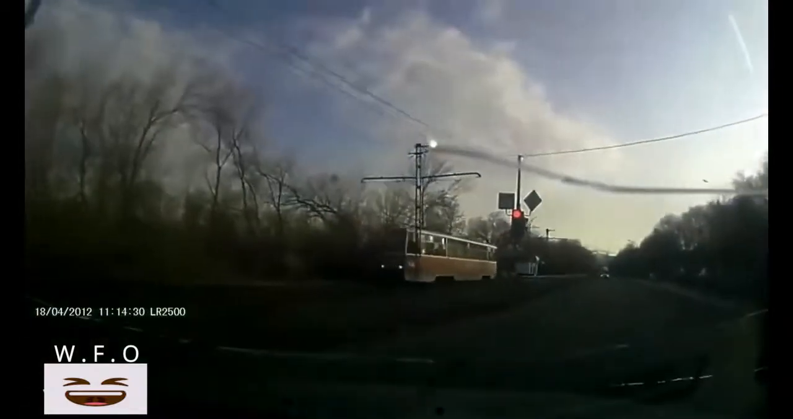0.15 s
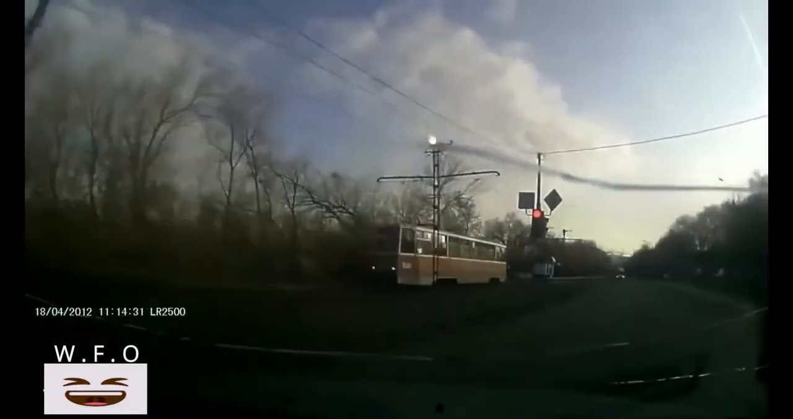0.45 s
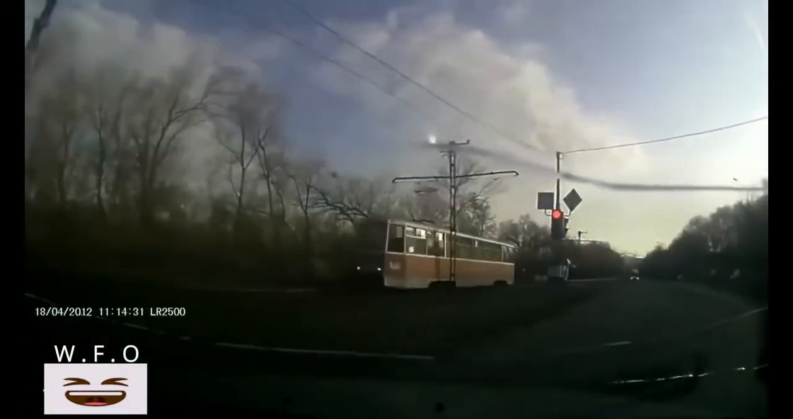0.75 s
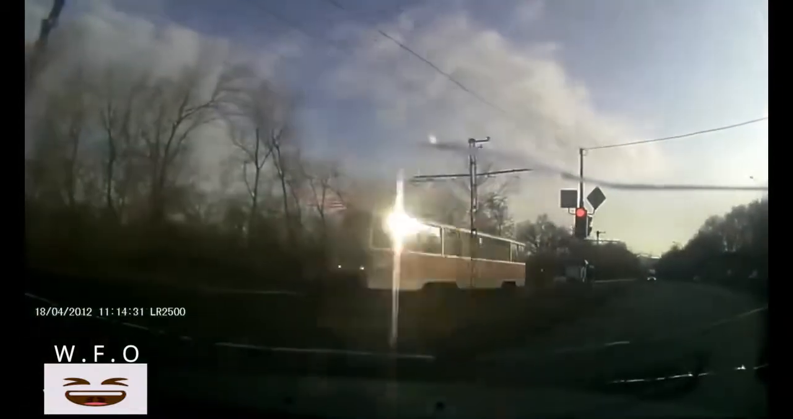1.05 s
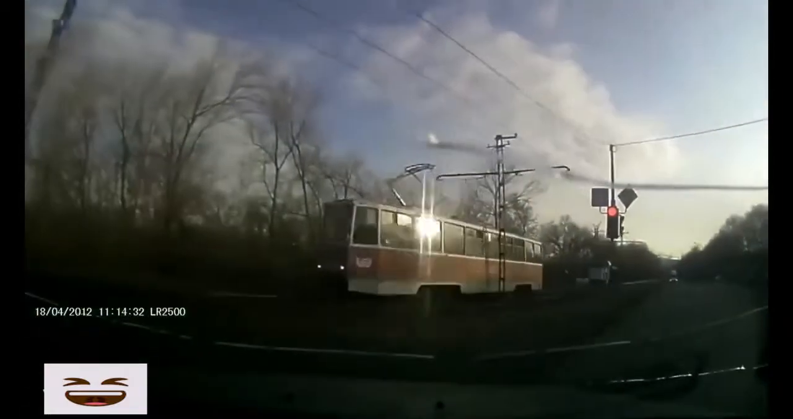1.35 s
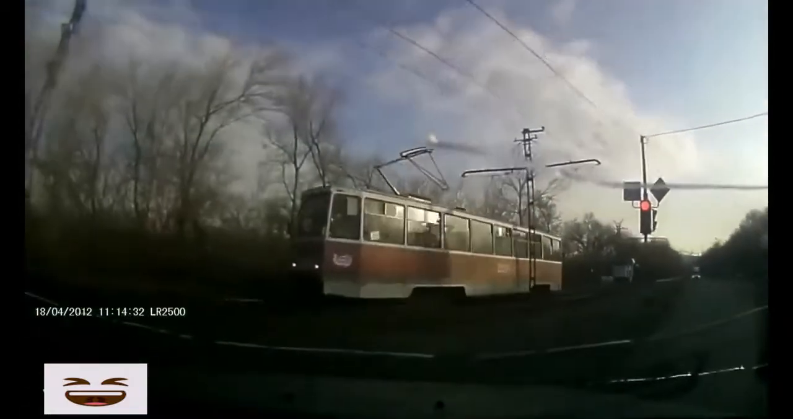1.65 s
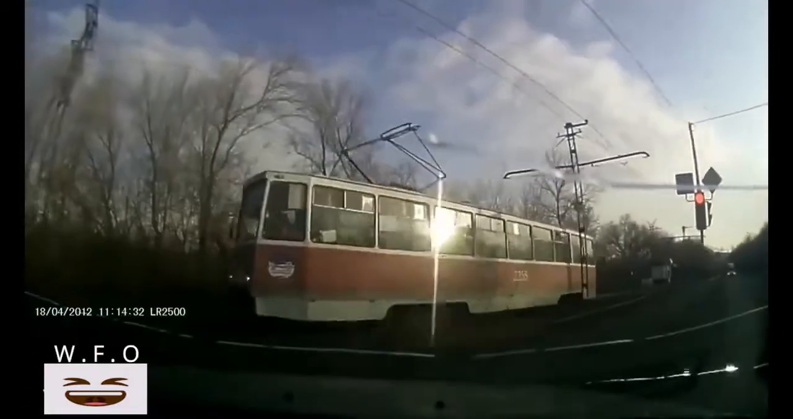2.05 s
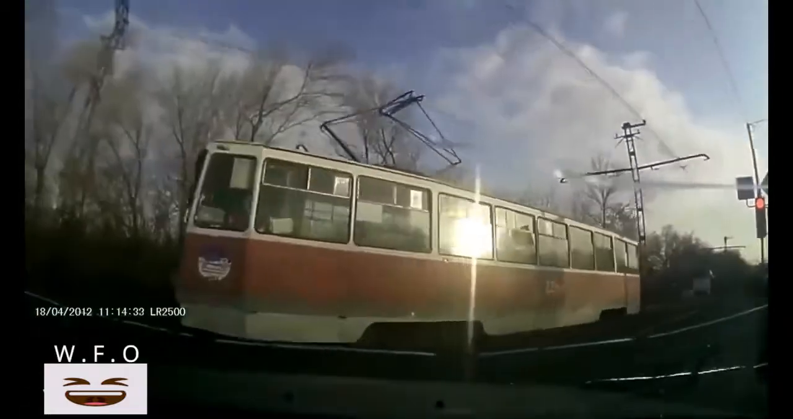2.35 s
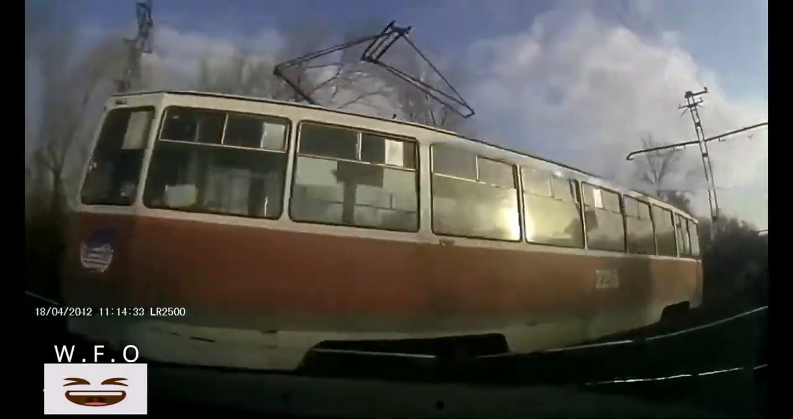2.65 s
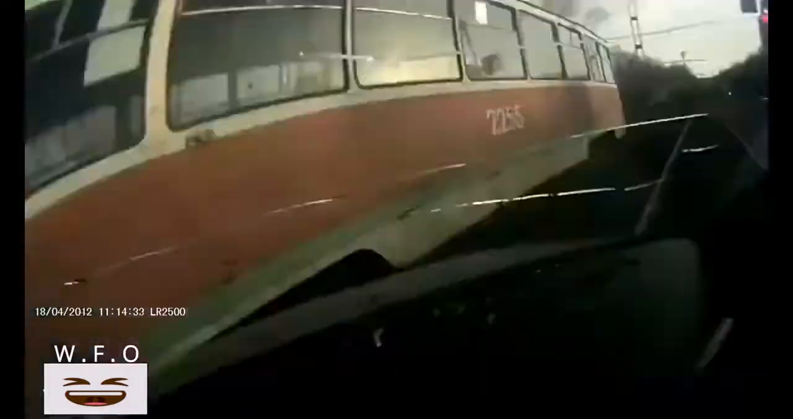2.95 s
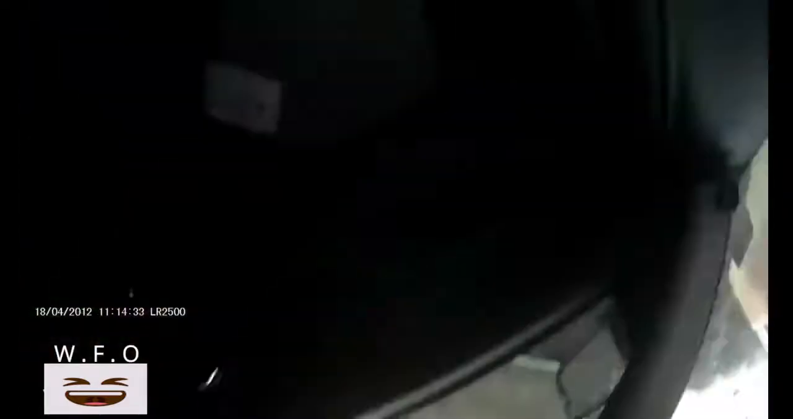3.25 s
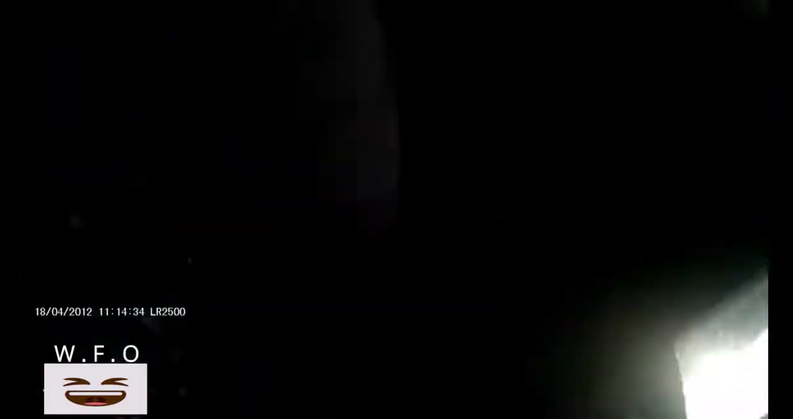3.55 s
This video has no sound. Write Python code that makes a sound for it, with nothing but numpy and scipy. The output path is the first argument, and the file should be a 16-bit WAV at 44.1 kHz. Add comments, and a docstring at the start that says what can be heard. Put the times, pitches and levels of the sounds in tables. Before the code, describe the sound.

A car crash: rumbling, rattling cabin with glassy clinks, then violent crunching metal impact

```python
"""Glassy clinks die away, road rumble and a drone swell, loose trim rattles; then the car body crunches and heaves.
This is the inside of a car that runs into a tram, heard by a small dashboard camera.
Filtered noise makes road, rattle, grit and crunches; decaying sines make clinks and ringing panels.
The microphone port rings in the treble, and the crash overloads it so that the clatter chokes in gaps."""
import sys
import numpy as np
from scipy import signal
from scipy.fft import rfft, irfft, next_fast_len
from scipy.io import wavfile
from scipy.ndimage import uniform_filter1d

SR = 44100
rng = np.random.default_rng(int(sys.argv[2]) if len(sys.argv) > 2 else 0)


def materialize(psi):
    """Save the field psi as 16-bit PCM at rate SR to the path in sys.argv[1].

    A 1-D psi becomes a single channel; in a 2-D psi each row is a channel.
    """
    bounded = np.clip(np.atleast_2d(psi).T, -1, 1)
    quanta = np.round(bounded * 32767).astype(np.int16)
    wavfile.write(sys.argv[1], SR, quanta)


N = 163170

# Levels are relative, ahead of any offset in the functions; spectra give relative power density.
# Low rumble and tyre roar. Each row: time in seconds, level in dB.
RUMBLE_LEVEL = [(0.0, -36.5), (0.3, -35.5), (0.41, -25), (0.46, -32), (0.5, -18), (0.65, -25.5),
                (1.5, -22.5), (2.04, -22.5), (2.43, -33), (2.59, -20), (2.91, -25), (2.96, -18),
                (3.04, -20), (3.2, -15.5), (3.7, -12.5)]
ROAR_LEVEL = [(0, -43.5), (.3, -47), (.42, -37), (.56, -37), (.63, -41), (.71, -36), (.8, -41.5),
              (1.2, -40), (1.45, -37.5), (1.6, -37), (1.72, -36.5), (1.9, -35.5), (2.2, -32.5), (2.5, -34),
              (2.64, -28), (2.92, -30), (3.0, -33.5), (3.2, -29), (3.7, -26)]
# Spectra of rumble and roar. Each row: frequency in Hz, density in dB.
RUMBLE_SPECTRUM = [(8, -11.5), (20, 7), (35, -1), (55, -5.5), (75, -5.5), (110, -16.5), (200, -32.5),
                   (500, -78.5)]
ROAR_SPECTRUM = [(30, -4), (100, 3), (170, 1), (250, -2.5), (350, -9.5), (550, -14), (1000, -26),
                 (2000, -33.5), (4500, -43), (12000, -46)]
# Drone of the running gear. Each row: time in seconds, level in dB.
DRONE_LEVEL = [(0, -49), (.64, -43), (.71, -29), (.8, -52), (1.28, -29.5), (1.38, -23), (1.5, -18),
               (1.64, -17.5), (1.72, -32.5), (2.12, -31), (2.2, -19.5), (2.39, -20), (2.48, -30),
               (2.62, -21.5), (2.9, -30.5), (3.7, -26)]
# Drone pitch. Each row: time in seconds, pitch in Hz before its random waver.
DRONE_PITCH = [(0, 105.4), (1.4, 109.8), (1.66, 123.7), (1.8, 101.8), (2.2, 122), (2.45, 141.9),
               (2.68, 162.3), (2.86, 164.4), (3.0, 140)]
# Drone partials. Each row: multiple of the drone pitch, level in dB.
DRONE_PARTIALS = [(.31, -2), (0.659, -7), (1, 4), (1.3, -6), (2, -15)]
# Fine rattle of loose parts. Each row: time in seconds, level in dB.
RATTLE_LEVEL = [(0, -27.5), (.2, -29.5), (.27, -33.5), (.5, -30), (.75, -37.5), (.9, -36.5), (1.15, -42),
                (1.5, -38), (1.8, -43.5), (2.1, -39.5), (2.3, -36.5), (2.9, -37.5), (3.0, -35.5),
                (3.1, -23), (3.42, -24.5), (3.7, -18)]
# Rattle spectrum. Each row: frequency in Hz, density in dB.
RATTLE_SPECTRUM = [(100, 2), (500, 5), (1200, 6), (2200, 2.5), (3200, 1), (4500, -4), (6200, -2.5),
                   (9000, 1), (11000, -4.5), (15000, 5)]
# Sharp knocks of trim. Each row: start in seconds, level in dB, decay to 1/e in seconds.
TRIM_KNOCKS = [(.002, -26, 0.0078), (0.126, -23, 0.0061), (0.19, -26, 0.0067), (0.301, -19, 0.0048),
               (0.317, -26.5, 0.0053), (0.357, -28, 0.0053), (0.504, -33, 0.022), (0.577, -25.5, 0.0079),
               (0.604, -35.5, 0.0066), (1.031, -31.5, 0.0028), (1.204, -36, 0.0094), (1.266, -39, 0.0053),
               (1.572, -34.5, 0.008), (2.003, -37, 0.0097)]
# Knock spectrum. Each row: frequency in Hz, density in dB.
KNOCK_SPECTRUM = [(100, -6), (600, 6.5), (1500, 5), (3200, 1.5), (4500, -1), (7000, -1), (15000, 0)]
# Thin ticks of small loose things. Each row: time of the peak in seconds, level in dB.
THIN_TICKS = [(0.0435, -22), (0.746, -36), (0.77, -37), (1.381, -27.5), (2.28, -36), (2.303, -37),
              (2.319, -27), (2.3867, -30), (2.398, -25), (2.4259, -27.5), (2.482, -28), (2.527, -30),
              (2.6675, -25), (2.729, -28.5), (2.782, -36), (2.805, -34)]
# Spectrum of ticks and sizzle. Each row: frequency in Hz, density in dB.
TICK_SPECTRUM = [(300, -25), (1500, -7), (3000, -5.5), (4500, -3), (7000, -7), (10000, -8), (15000, 1)]
TICK_RISE_S, TICK_DECAY_S = 0.0016, 0.0048
# Hollow taps of plastic panels. Each row: start in seconds, level in dB, pitch in Hz.
PANEL_TAPS = [(.695, -34, 543), (1.557, -37, 1300), (1.594, -39, 280), (1.675, -39.5, 1030),
              (1.378, -41.5, 1650), (1.824, -36, 1330), (2.6, -31, 756), (2.68, -34.5, 1330)]
TAP_DECAY_S, TAP_WIDTH_HZ = .012, 330
# Glassy clinks. Each row: start in seconds, level in dB, pitch in Hz before glide and waver.
CLEAR_CLINKS = [(.005, -33, 6500), (.045, -33, 4700), (.03, -36, 5640), (.088, -31, 5700), (.14, -36, 4600),
                (0.27, -39, 4700), (.16, -37, 5800), (.15, -34, 10134), (.19, -28, 5230), (0.18, -34, 6000),
                (.222, -35, 7300), (0.39, -31, 3014), (.385, -29.5, 6400), (.39, -46, 3100),
                (0.5, -32, 2900), (.45, -39, 4700), (.49, -31, 4130), (0.48, -35, 3600), (.61, -41.5, 4160),
                (0.18, -40, 5100), (.065, -45, 4100), (0.507, -30, 7800), (0.43, -39, 7300),
                (.808, -38, 6258), (0.838, -34.5, 2612)]
CLINK_DECAY_S, CLINK_RISE_SHARE = 0.02, 0.6  # rise as a share of the decay
CLINK_GLIDE_PER_S, CLINK_WAVER = .7, .008  # shares of the pitch; glide is scaled at random
# Range of decay times in the clink shower: shortest and longest in seconds.
SHOWER_DECAY_S = (.004, .014)
SHOWER_DB_PER_OCTAVE = 5
# Bright sizzle of grit. Each row: time in seconds, level in dB.
SIZZLE_LEVEL = [(0, -49), (.8, -46), (1.1, -74), (2.0, -75), (2.3, -52), (2.5, -51), (2.65, -47),
                (2.9, -61), (3.7, -27)]
# Thin wavering whine. Each row: time in seconds, level in dB.
WHINE_LEVEL = [(.33, -52.5), (.39, -48), (.44, -45.5), (.49, -48), (.53, -64), (.6, -82), (.68, -51.5),
               (.73, -63), (.79, -58), (.9, -92)]
WHINE_CENTRE_HZ = 4305
# Bumps in the road. Each row: start in seconds, level in dB, length in seconds.
ROAD_BUMPS = [(1.944, -16.5, 0.157), (2.3, -23, 0.0771)]
BOOM_HZ, BOOM_Q, BOOM_FADE_DB = 136.5, 3.3, -6.5
# Crunches of the collision. Each row: start in seconds, length before the fall in seconds, level in dB.
CRUNCH_BURSTS = [(2.9394, .0015, -6), (3.054, 0.0048, -21), (3.063, 0.0018, -0.5), (3.068, 0.021, -14),
                 (3.117, 0.0074, -12.5), (3.124, 0.0016, -5), (3.134, 0.0015, -9.5), (3.158, 0.0044, -19),
                 (3.166, 0.0064, -12), (3.186, 0.013, -20.5), (3.203, 0.0157, -18.5),
                 (3.2585, 0.0031, -8.5), (3.268, 0.035, -23.5), (3.284, 0.0028, -17),
                 (3.329, 0.0035, -18.5), (3.362, 0.014, -20), (3.428, .008, -23.5), (3.443, 0.015, -22),
                 (3.467, .006, -21), (3.476, 0.015, -17.5), (3.514, 0.012, -14.5), (3.526, 0.031, -4.5),
                 (3.569, 0.025, -13.5), (3.589, 0.014, -14.5), (3.616, 0.02, -14.5), (3.666, 0.0077, -14),
                 (3.68, .011, -29)]
# Crunch spectrum. Each row: frequency in Hz, density in dB.
CRUNCH_SPECTRUM = [(40, 14), (150, 21), (400, 14), (800, 2), (1500, -6), (3000, 3), (4500, -1.5),
                   (7000, -2), (15000, 8.5)]
CRUNCH_RISE_S, CRUNCH_DECAY_S = .001, .0018
PART_DB, PART_Q = -11, 5
# Heavy blows on the panels. Each row: start in seconds, level in dB, pitch of the modes hit hardest in Hz.
PANEL_BLOWS = [(2.939, -16.5, 348.7), (3.06, -1.5, 141), (3.066, -9, 607), (3.163, -18, 613),
               (3.202, -13.5, 900), (3.257, -13, 2000), (3.427, -20, 141), (3.531, -9, 423),
               (3.543, -1.5, 710), (3.574, -12.5, 112)]
BLOW_DB_PER_OCTAVE = 7
# Modes of the buckling panels. Each row: lowest pitch in Hz, level in dB, 60 dB decay in seconds.
PANEL_MODES = [(121, 1, 0.075), (154.6, 2, 0.13), (272, 3.5, 0.056), (365, -3, 0.077), (495, -0.5, 0.034),
               (587, -7, 0.037), (910, -14, 0.065), (1240, -20, 0.025), (2610, -2, 0.028)]
# Heaves of cabin air as the body buckles and the camera is thrown.
# Each row: rebound time in seconds, length of the suck in seconds, length of the push in seconds, level in dB.
AIR_HEAVES = [(2.956, .017, .012, -12), (3.105, .02, .013, -4), (3.149, .024, .013, -3),
              (3.318, .013, .017, -10), (3.509, .016, .011, -6), (3.664, .022, .019, -3)]
HEAVE_RISE_S, HEAVE_EDGE_S = .007, .0015
PORT_HZ, PORT_Q = 4480, 14.3
CEILING, KNEE, COUPLING_HZ = .38, 2.7, 6.5
FULL_SCALE, LEAK, EDGE_HZ = .42, .026, 15900


def amp(db):
    """Amplitude from dB."""
    return 10 ** (np.asarray(db) / 20)


def evened(x):
    """Scales to rms 1."""
    return x / np.sqrt(np.mean(x ** 2) + 1e-20)


def noise(length=N):
    """White noise."""
    return rng.standard_normal(length)


def curve(rows):
    """Second column of a table, interpolated over time."""
    s, value = np.transpose(rows)
    return np.interp(np.arange(N) / SR, s, value)


def add(mix, s, sound):
    """Adds a sound in place from s seconds, cut at the end."""
    part = mix[max(round(s * SR), 0):][:len(sound)]
    part += sound[:len(part)]


def colour(x, points):
    """Causal minimum-phase filter with the given spectrum; white noise keeps its power."""
    hz, db = np.transpose(points)
    size = 2 * next_fast_len(N)
    bin_hz = abs(np.fft.fftfreq(size, 1 / SR)) + 1
    gain = evened(amp(np.interp(np.log(bin_hz), np.log(hz), db)))
    response = np.exp(np.conj(signal.hilbert(np.log(gain))))
    return irfft(rfft(x, size) * response[:size // 2 + 1])[:N]


def wander(hz):
    """Random drift of rms 1, low-passed near hz."""
    ratio = np.fft.rfftfreq(N, 1 / SR) / hz
    return evened(irfft(rfft(noise()) / (1 + ratio ** 4), N))


def steady(x, span_s):
    """Evens out swings slower than the span."""
    power = uniform_filter1d(x ** 2, max(int(span_s * SR), 1))
    return x / np.sqrt(abs(power) + 1e-12)


def contacts(per_s, spread_db, most):
    """Random clicks of either sign and uneven strength."""
    struck = rng.random(N) < per_s / SR
    strength = amp(spread_db * np.minimum(rng.exponential(1, N), most))
    return struck * rng.choice([-1, 1], N) * strength


def road():
    """Lumpy rumble and tyre roar from noise; a rough drone from partials of a wavering pitch."""
    rumble = steady(colour(noise(), RUMBLE_SPECTRUM), 0.124) * amp(curve(RUMBLE_LEVEL) + 0.5)
    roar_db = curve(ROAR_LEVEL) + 6.0 + 2.2 * wander(23.3)
    roar = steady(colour(noise(), ROAR_SPECTRUM), 0.32) * amp(roar_db)
    turns = np.cumsum(curve(DRONE_PITCH) * (1 + 0.0244 * wander(28.3))) / SR
    drone = np.zeros(N)
    for multiple, db in DRONE_PARTIALS:
        partial = np.sin(2 * np.pi * (multiple * turns + rng.random()))
        drone += amp(db) * partial * (1 + .22 * wander(30))
    return rumble + roar + steady(drone, 0.32) * amp(curve(DRONE_LEVEL) - 3.5)


def rattle(per_s=700, spread_db=5, hiss=0.88, clump_db=2.3):
    """Many tiny contacts over a fine hiss, swelling together in clumps."""
    grit = evened(evened(contacts(per_s, spread_db, 4)) + hiss * noise())
    level_db = curve(RATTLE_LEVEL) - 6.0 + clump_db * wander(24)
    return colour(grit * amp(level_db), RATTLE_SPECTRUM)


def knocks():
    """Dry knocks and thin ticks are decaying noise; hollow taps are noise through a panel resonance."""
    sharp, thin, hollow = np.zeros((3, N))
    t = np.arange(SR // 10) / SR
    for s, db, decay_s in TRIM_KNOCKS:
        add(sharp, s, amp(db) * np.exp(-t / decay_s) * noise(len(t)))
    after_peak = t - 2 * TICK_RISE_S
    tick = np.exp(np.minimum(after_peak / TICK_RISE_S, -after_peak / TICK_DECAY_S))
    for s, db in THIN_TICKS:
        add(thin, s - 2 * TICK_RISE_S, amp(db) * tick * noise(len(t)))
    for s, db, hz in PANEL_TAPS:
        resonance = signal.iirpeak(hz, hz / TAP_WIDTH_HZ, SR)
        panel = evened(signal.lfilter(*resonance, noise(len(t))))
        add(hollow, s, amp(db) * np.exp(-t / TAP_DECAY_S) * panel)
    return colour(sharp, KNOCK_SPECTRUM) + colour(thin, TICK_SPECTRUM) + hollow


def cabin(x, wet_db=-7, t60=0.087, count=40):
    """Quick reflections from windscreen and dashboard, each weaker the later it comes."""
    taps = np.zeros(SR // 10)
    for u, sign in zip(rng.random(count), rng.choice([-1, 1], count)):
        s = 0.001053 + 0.048 * u
        add(taps, s, np.array([sign * amp(-60 * s / t60)]))
    reflected = signal.fftconvolve(x, taps / np.linalg.norm(taps))[:N]
    return (x + amp(wet_db) * reflected) / np.hypot(1, amp(wet_db))


def clink_shower(count=420, shower_db=-39, fade_db_per_s=20, shower_s=1.3, scatter_db=5):
    """Rows of start, level, pitch and decay for small clinks that thin out and fade."""
    when, size, pitch, damping = rng.random((count, 4)).T
    when_s = shower_s * when ** 1.6
    hz = 3500 + 9500 * pitch ** 2.2
    db = shower_db - fade_db_per_s * when_s + scatter_db * (2 * size - 1)
    db += SHOWER_DB_PER_OCTAVE * np.log2(hz / PORT_HZ)
    return list(zip(when_s, db, hz, np.interp(damping, [0, 1], SHOWER_DECAY_S)))


def clinks():
    """Clear clinks over a shower of shorter ones: brief sines that waver and slide in pitch."""
    out, t = np.zeros(N), np.arange(SR // 6) / SR
    waver = wander(110)
    clear = [(*row, CLINK_DECAY_S) for row in CLEAR_CLINKS]
    for s, db, hz, decay_s in clear + clink_shower():
        glide = CLINK_GLIDE_PER_S * rng.uniform(-0.97, 0.49) * t
        bend = glide + CLINK_WAVER * waver[rng.integers(N - len(t)):][:len(t)]
        envelope = (1 - np.exp(-t / (CLINK_RISE_SHARE * decay_s))) * np.exp(-t / decay_s)
        turns = np.cumsum(hz * (1 + bend)) / SR
        add(out, s, amp(db) * envelope * np.sin(2 * np.pi * turns))
    return out


def sizzle(clump_db=4):
    """Fine grit as bright noise in quick flurries."""
    level_db = curve(SIZZLE_LEVEL) + clump_db * wander(70)
    return colour(noise() * amp(level_db), TICK_SPECTRUM)


def whine():
    """A thin tone among the clinks, rough in pitch and unsteady in level."""
    turns = np.cumsum(WHINE_CENTRE_HZ + 25 * wander(20) + 30 * wander(150)) / SR
    return amp(curve(WHINE_LEVEL)) * np.sin(2 * np.pi * turns) * (1 + .5 * wander(50))


def bumps():
    """The cabin booms in a narrow band of noise for a moment from each bump."""
    level = np.zeros(N)
    edges_hz = BOOM_HZ * (1 + np.array([-.5, .5]) / BOOM_Q)
    band = signal.butter(2, edges_hz, "band", fs=SR, output="sos")
    boom = steady(signal.sosfilt(band, noise()), 0.039)
    for s, db, length_s in ROAD_BUMPS:
        u = np.linspace(0, 1, int(length_s * SR))
        add(level, s, amp(db + BOOM_FADE_DB * u) * signal.windows.tukey(len(u), .25))
    return level * boom


def crunches(grain_db=3.0, snaps_per_s=1100, snap_db=4, hiss=0.32, lump_db=3):
    """Bursts of snapping metal and plastic; each breaking part has its own resonance."""
    force, parts = np.zeros((2, N))
    t = np.arange(SR // 8) / SR
    for s, length_s, db in CRUNCH_BURSTS:
        fall = np.exp(-np.maximum(t - length_s, 0) / CRUNCH_DECAY_S)
        burst = amp(db) * np.minimum(t / CRUNCH_RISE_S, 1) * fall
        add(force, s, burst)
        resonance = signal.iirpeak(350 * 4 ** rng.random(), PART_Q, SR)
        part = evened(signal.lfilter(*resonance, noise(len(t))))
        add(parts, s, amp(PART_DB) * burst * part)
    grainy_hiss = evened(noise() * amp(grain_db * wander(240)))
    grit = evened(evened(contacts(snaps_per_s, snap_db, 3)) + hiss * grainy_hiss)
    lumps = evened(amp(lump_db * wander(90)))
    return colour(force * grit * lumps, CRUNCH_SPECTRUM) + parts


def blows():
    """Each blow rings the panel modes, weaker the further they lie from its pitch."""
    body, t = np.zeros(N), np.arange(SR // 8) / SR
    for s, level_db, centre_hz in PANEL_BLOWS:
        for hz, db, t60 in PANEL_MODES:
            distance_db = BLOW_DB_PER_OCTAVE * abs(np.log2(hz / centre_hz))
            envelope = amp(level_db + db - distance_db - 60 * t / t60)
            ring = np.sin(2 * np.pi * hz * rng.uniform(1.0, 1.04) * t)
            add(body, s, envelope * rng.choice([-1, 1]) * ring)
    return body


def heaves():
    """A suck of air (negative pressure) and its sudden rebound (positive)."""
    air, t = np.zeros(N), np.arange(SR // 8) / SR
    for s, suck_s, push_s, db in AIR_HEAVES:
        held = np.clip(np.minimum(t, suck_s + push_s - t) / HEAVE_RISE_S, 0, 1)
        add(air, s - suck_s, amp(db) * held * np.tanh((t - suck_s) / HEAVE_EDGE_S))
    return air


def scene():
    """Road, trim, clinks and crash summed to one channel."""
    trim = cabin(rattle(), wet_db=-4.5) + cabin(knocks(), wet_db=-9) + sizzle()
    crash = crunches() + blows() + heaves()
    return (road() + trim + clinks() + whine() + bumps() + crash)[None]


def record(dry):
    """The port rings; the preamplifier saturates, sags back and meets full scale; then the band limit."""
    ratio = np.fft.rfftfreq(2 * N, 1 / SR) / PORT_HZ
    port = 1 / (1 - ratio ** 2 + 1j * ratio / PORT_Q)
    rung = irfft(rfft(dry, 2 * N) * port)[:, :N]
    fine = signal.resample_poly(rung, 2, 1, axis=1)  # saturates at twice the rate
    saturated = fine / (1 + abs(fine / CEILING) ** KNEE) ** (1 / KNEE)
    saturated = signal.resample_poly(saturated, 1, 2, axis=1)
    sagged = signal.lfilter(*signal.butter(1, COUPLING_HZ, "high", fs=SR), saturated)
    limited = np.clip(sagged, -FULL_SCALE, FULL_SCALE) + LEAK * rung  # a little leaks past
    band_limit = signal.firwin(201, EDGE_HZ, window=("kaiser", 8), fs=SR)
    return signal.oaconvolve(limited, band_limit[None], "same")


dry = scene()
out = record(dry)
materialize(out)
```